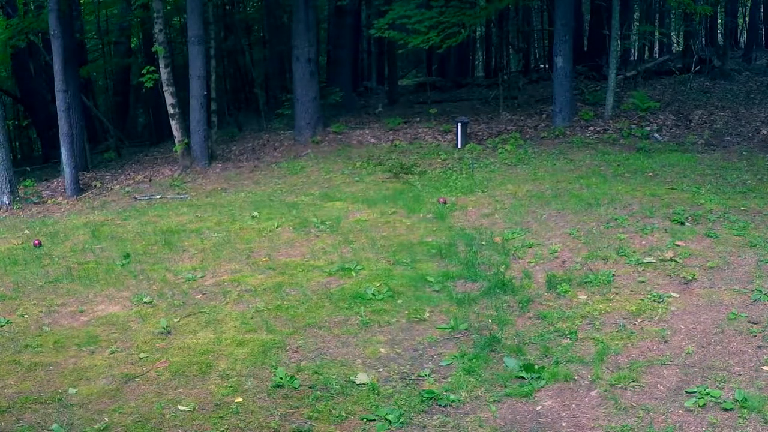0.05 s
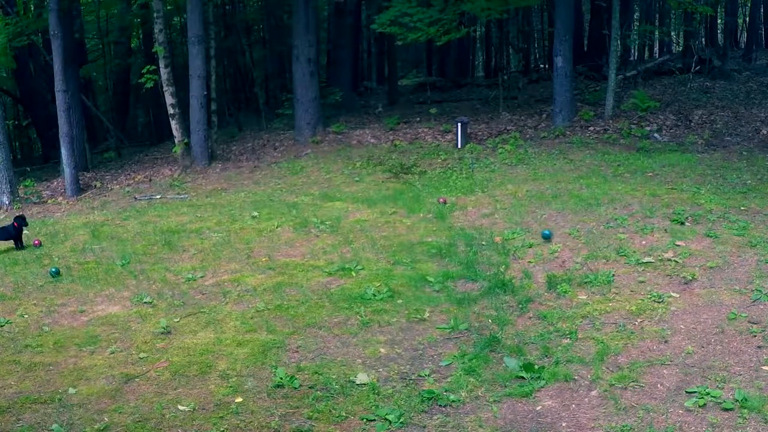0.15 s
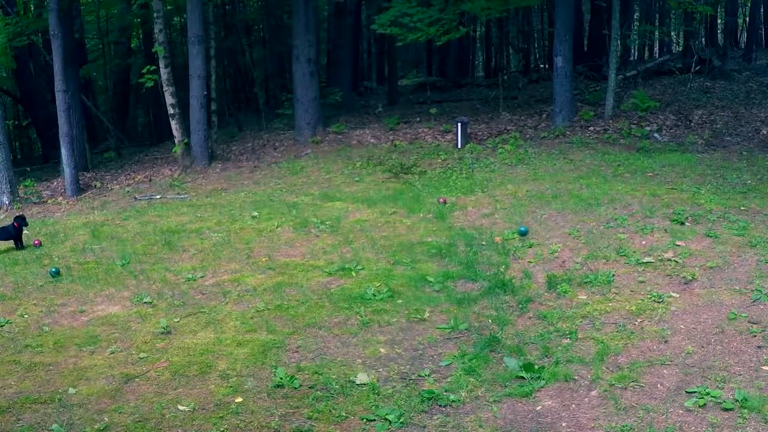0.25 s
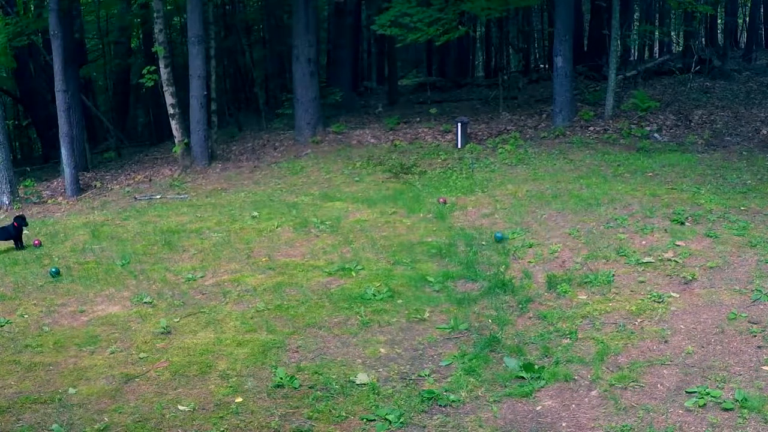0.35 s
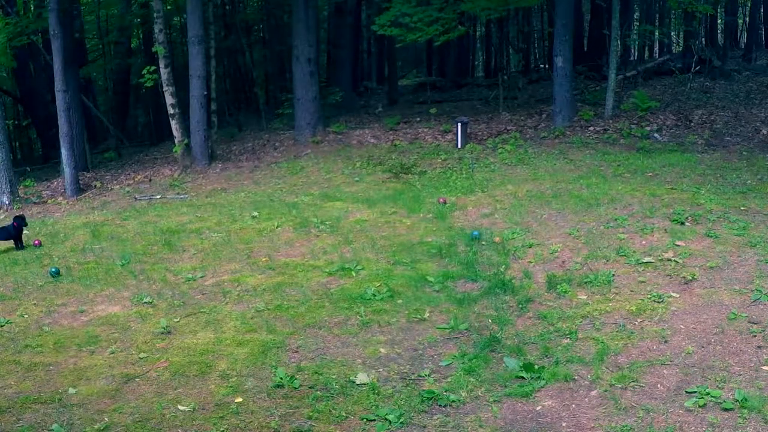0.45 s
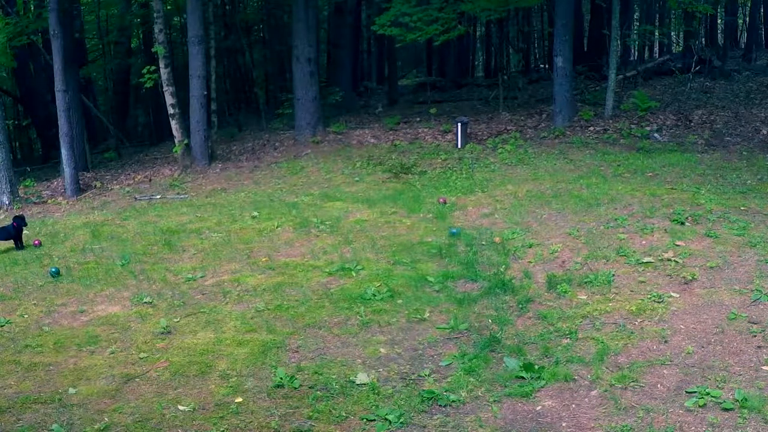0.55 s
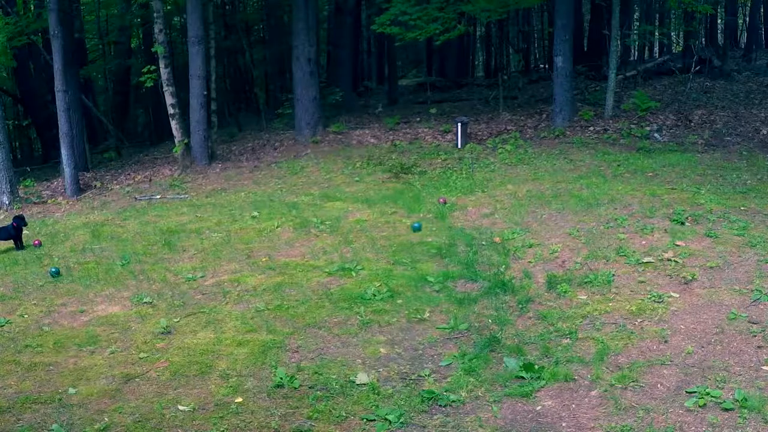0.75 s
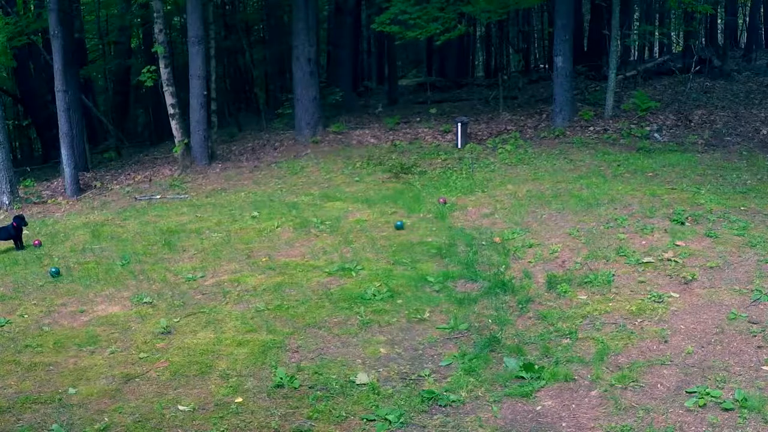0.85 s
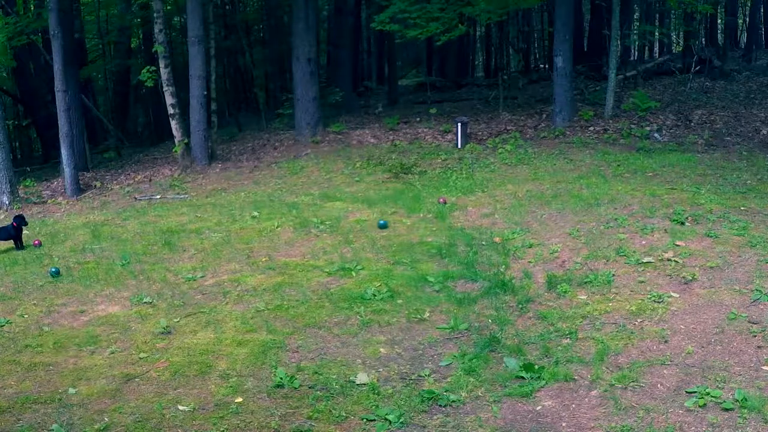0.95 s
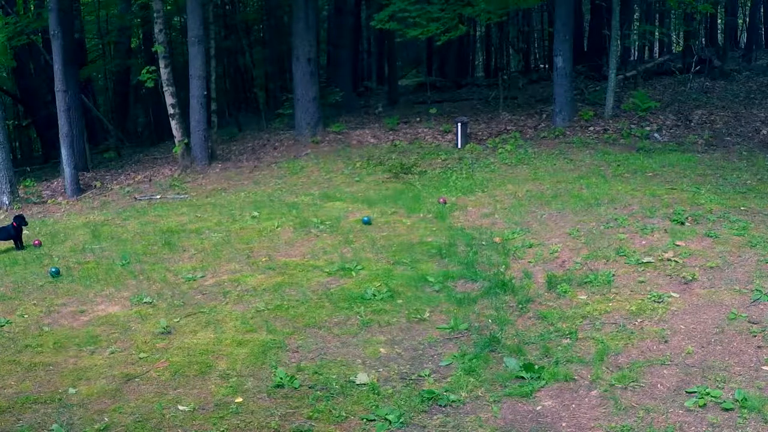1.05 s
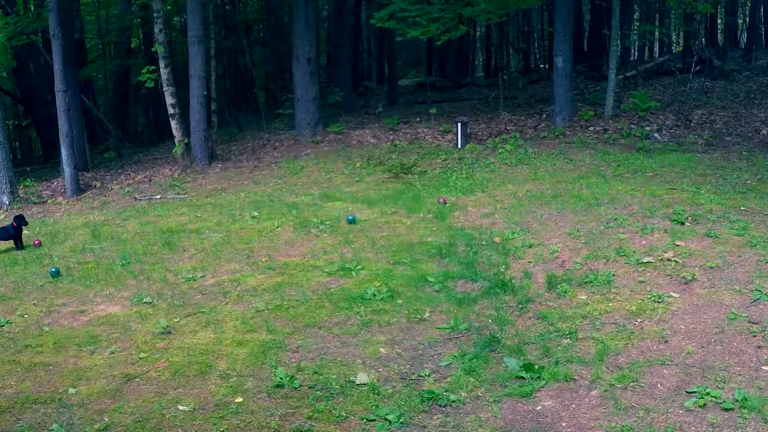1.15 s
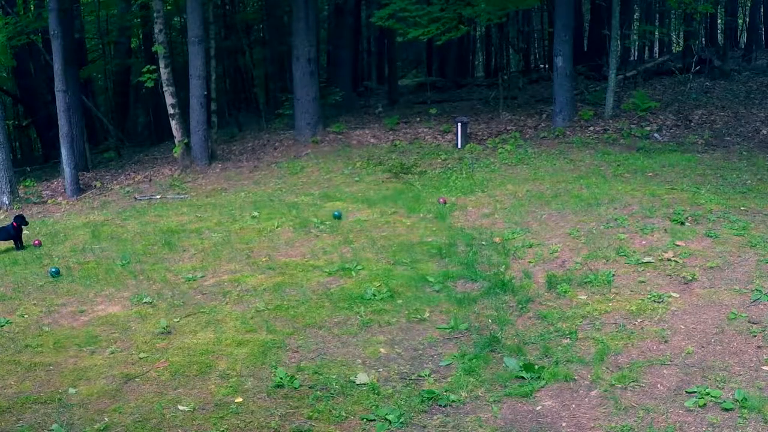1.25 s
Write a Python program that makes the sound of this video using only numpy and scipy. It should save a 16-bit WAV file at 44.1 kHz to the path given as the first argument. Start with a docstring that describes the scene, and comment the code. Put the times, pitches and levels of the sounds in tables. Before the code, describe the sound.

A hard ball knocks once on a lawn, followed by a low fading boom.

```python
"""A hard ball gives one short knock on a lawn ringed by trees, which scatter a short echo.
Just after it a low boom sets in and hums away, probably the structure under the microphone shaking.
Two soft low bumps come ahead of the boom, and a few faint scuffs sound over the quiet
hiss and rumble of the open air."""
import sys
import numpy as np
from scipy import signal
from scipy.fft import irfft
from scipy.io import wavfile
from scipy.ndimage import uniform_filter1d

SR = 44100
rng = np.random.default_rng(int(sys.argv[2]) if len(sys.argv) > 2 else 0)


def file_out(sig):
    """Save sig as 16-bit WAV at sys.argv[1]."""
    # one column per channel
    cols = np.atleast_2d(sig).T
    # limit, then scale
    lim = np.clip(cols, -1, 1)
    pcm = np.round(lim * 32767).astype(np.int16)
    wavfile.write(sys.argv[1], SR, pcm)


N = 57330


def amp(db):
    """Decibels to gain."""
    return 10 ** (np.asarray(db) / 20)


def unit(x):
    """Scales to an rms of one."""
    return x / np.sqrt(np.mean(x ** 2) + 1e-20)


def read(points, hz):
    """Reads a table along a log-frequency axis."""
    f, value = np.transpose(points)
    return np.interp(np.log(hz + 1), np.log(f + 1), value)


def since(start):
    """Seconds since start, zero before it."""
    return np.maximum(np.arange(N) / SR - start, 0)


def delayed(x, seconds):
    """The same sound, later."""
    return np.interp(np.arange(N) - seconds * SR, np.arange(N), x, left=0)


def dulled(x, edge_hz, order=2):
    """Rolls off the treble above edge_hz."""
    return signal.sosfilt(signal.butter(order, min(edge_hz, SR / 2 - 1), fs=SR, output="sos"), x)


def noise(colour):
    """Steady noise of a given spectrum, rms one."""
    hz = np.fft.rfftfreq(N, 1 / SR)
    phases = np.exp(2j * np.pi * rng.random(len(hz)))
    return unit(irfft(amp(read(colour, hz)) * phases, N))


def open_air():
    """Quiet hiss and rumble over the lawn, drifting by about 1 dB in patches of pitch and time."""
    # spectrum of the air: f/Hz, relative density/dB
    colour = [(10, -13), (22, 2.5), (45, -1), (70, 0.5), (95, -8.5), (140, -13.5), (220, -15), (340, -19),
              (560, -21), (800, -23.5), (1100, -24), (1260, -19), (1480, -26), (2500, -26), (4000, -27.5),
              (7000, -33), (15000, -38)]
    spectrogram = signal.stft(noise(colour), nperseg=1024, noverlap=768)[2]
    across_pitch = uniform_filter1d(rng.standard_normal(spectrogram.shape), size=14, axis=0)
    drift_db = unit(uniform_filter1d(across_pitch, size=12, axis=1))
    return amp(-59) * signal.istft(spectrogram * amp(drift_db), nperseg=1024, noverlap=768)[1][:N]


def low_bumps():
    """Faint, deep thumps, each a tone under a bell-shaped swell."""
    # bumps: centre t/s, level/dB, half length/s, f/Hz
    bumps = [(0.135, -54, 0.0071, 66.5), (.222, -54, 0.025, 74)]
    t = since(0)
    return sum(amp(db) * np.exp(-((t - centre) / half) ** 2) * np.cos(2 * np.pi * hz * (t - centre))
               for centre, db, half, hz in bumps)


def scuffs():
    """Short bright brushes of noise that swell and fade."""
    # brushes: t/s, level/dB, rise/s, decay/s, low-pass f/Hz
    brushes = [(0.166, -56.5, 0.0011, .004, 6050), (0.4278, -56.5, 0.0061, 0.011, 12100),
               (0.463, -61, .002, .007, 6000)]
    # spectrum of a scuff: f/Hz, relative density/dB
    colour = [(300, -24), (900, -15), (1400, 5.5), (2200, -11), (3000, 2), (3700, -2), (4300, 5),
              (4900, -11.5), (6000, -8), (7200, -4.5), (9000, -18.5), (15000, -10)]
    out = np.zeros(N)
    for start, db, rise, decay, edge_hz in brushes:
        envelope = np.minimum(since(start) / rise, 1) * np.exp(-since(start + rise) / decay)
        out += amp(db) * envelope * dulled(noise(colour), edge_hz)
    return out


def ball_knock():
    """The blow rings quickly damped modes; each builds up over a few cycles, so the treble leads."""
    # modes of the knock: f/Hz, relative level/dB, T60/s
    modes = [(404, -3, 0.017), (617, -5.5, 0.021), (1167, -6.5, 0.031), (1233, -3, .039),
             (1596, -12.5, 0.028), (1832, -0.5, 0.012), (2045, -16.5, 0.033), (2632, -7.5, 0.017),
             (2800, -16, 0.0082)]
    build_cycles = 2.87
    t = since(start=0.2177)
    ring = np.zeros(N)
    for hz, db, t60 in modes:
        build_up = np.sin(np.pi / 2 * np.minimum(t * hz / build_cycles, 1)) ** 2
        ring += amp(db - 60 * t / t60) * np.sin(2 * np.pi * hz * t) * build_up
    return amp(-33) * dulled(ring, edge_hz=4100, order=4)


def tree_echoes(direct):
    """The trees around the lawn return a few dull echoes and a thin scatter from their trunks."""
    # distinct echoes: delay/s, level/dB against the direct sound, low-pass f/Hz
    reflections = [(0.016, -20, 3600), (0.0283, -25, 2800), (0.0383, -10.5, 1500), (0.0611, -23.5, 1700),
                   (.0865, -34, 1400)]
    # spectrum of the scatter: f/Hz, relative level/dB
    colour = [(200, -28), (600, -11), (1000, -10.5), (1300, -10), (1800, 3.5), (2550, 5.5), (3200, -6),
              (6000, -2)]
    # decay of the scatter: f/Hz, T60/s
    decay_times = [(300, 0.34), (1250, 0.93), (1800, 0.31), (2600, 0.26), (6000, .15)]
    taps_per_s, rise_s, scatter_gain = 3000, 0.03, amp(-8.5) / 2
    echoes = sum(amp(db) * delayed(dulled(direct, hz), delay) for delay, db, hz in reflections)
    taps = rng.standard_normal(N) * (rng.random(N) < taps_per_s / SR)
    hz, t, spectrogram = signal.stft(taps, SR, nperseg=256)
    fade_db = read(colour, hz)[:, None] - 60 * t / read(decay_times, hz)[:, None]
    tail = signal.istft(spectrogram * amp(fade_db), SR, nperseg=256)[1][:N]
    tail *= np.minimum(since(0) / rise_s, 1)
    return echoes + scatter_gain * signal.fftconvolve(direct, tail / np.linalg.norm(tail))[:N]


def boom():
    """A deep mode starts abruptly and dies unevenly; an upper mode rings at each jolt."""
    # course of the deep mode: t/s, rms level/dB
    deep_levels = [(.265, -40), (.29, -43.5), (.355, -41), (.41, -43.5), (0.459, -45), (.49, -53),
                   (.545, -44), (.61, -50.5), (.68, -53.5), (.72, -51), (.9, -56), (.96, -61.5), (1.3, -67)]
    # jolts that ring the upper mode: t/s, level/dB
    jolts = [(0.2657, -47), (.46, -57)]
    deep_hz, upper_hz = 61.6, 117.7
    rise_s, upper_t60_s = 0.016, 0.56
    t = since(start=0.2615)
    deep_rms = amp(np.interp(since(0), *np.transpose(deep_levels))) * np.minimum(t / rise_s, 1)
    out = np.sqrt(2) * deep_rms * np.sin(2 * np.pi * deep_hz * t)
    for start, db in jolts:
        t = since(start)
        envelope = amp(db - 60 * t / upper_t60_s) * np.minimum(t / rise_s, 1)
        out += envelope * np.sin(2 * np.pi * upper_hz * t)
    return out


def scene():
    """The lawn from one microphone; only the knock echoes from the trees."""
    knock = ball_knock()
    return (knock + tree_echoes(knock) + boom() + low_bumps() + scuffs() + open_air())[None]


def record(dry):
    """The recorder cuts off the highest treble steeply."""
    edge_hz = 15350
    low_pass = signal.firwin(511, edge_hz, window=("kaiser", 9), fs=SR)
    return signal.oaconvolve(dry, low_pass[None], "same")


dry = scene()
out = record(dry)
file_out(out)
```